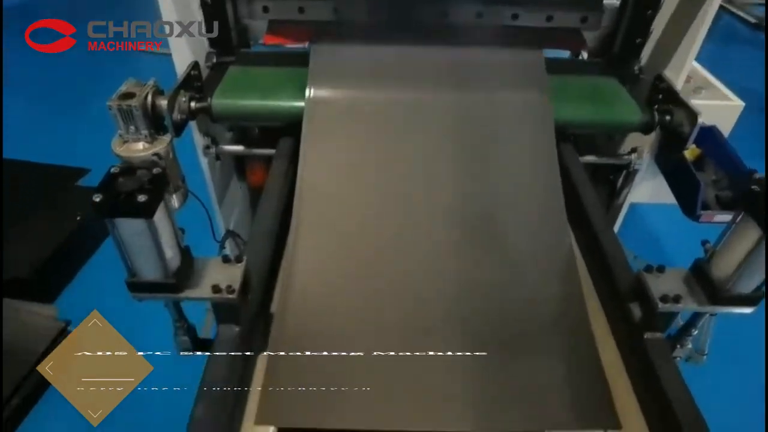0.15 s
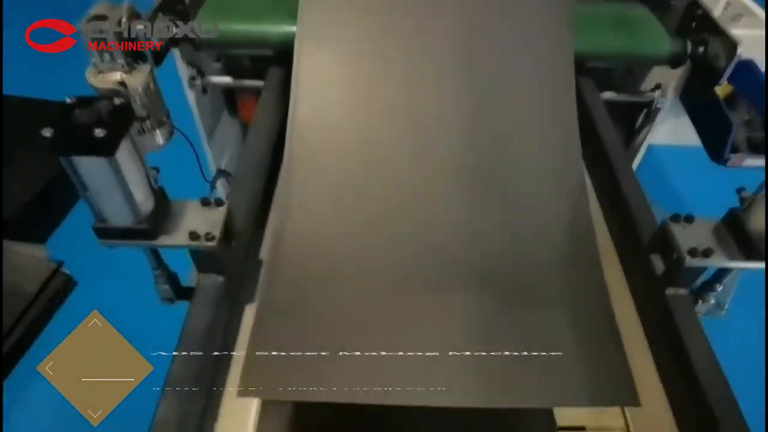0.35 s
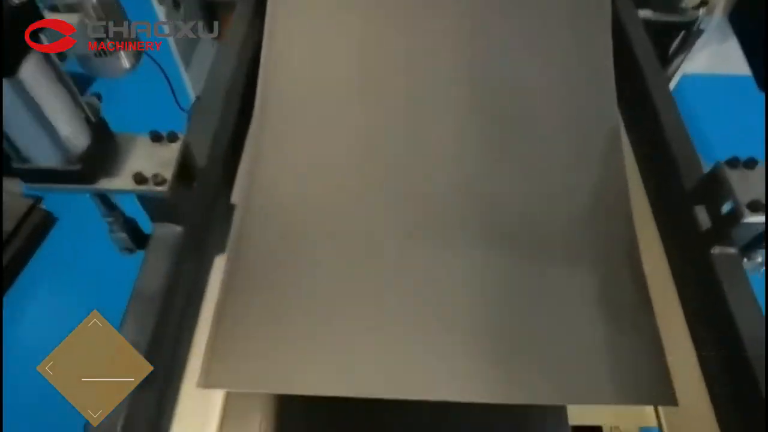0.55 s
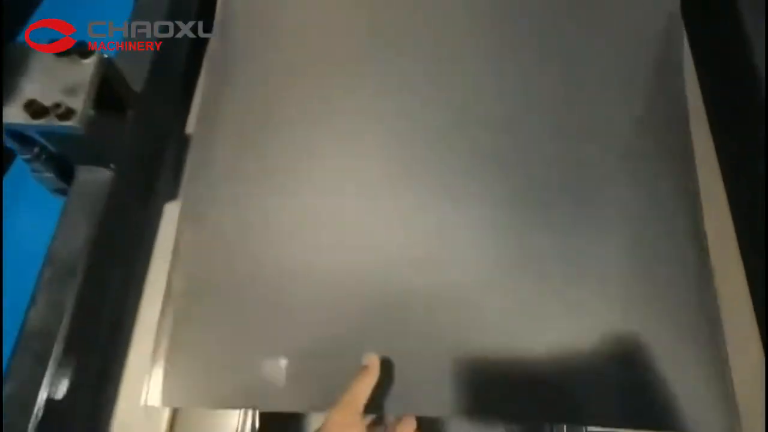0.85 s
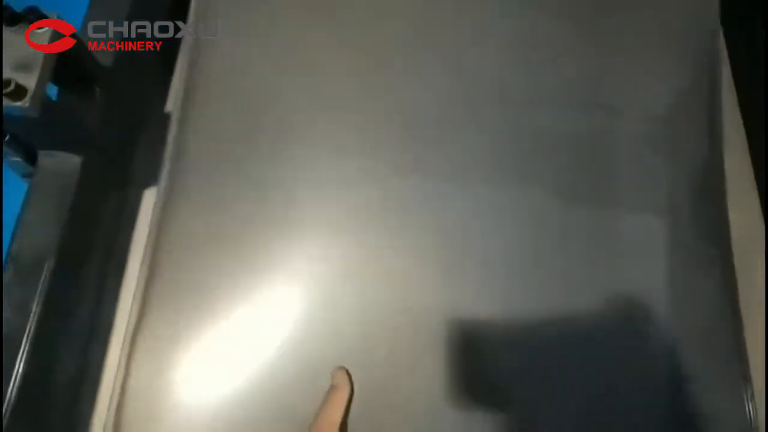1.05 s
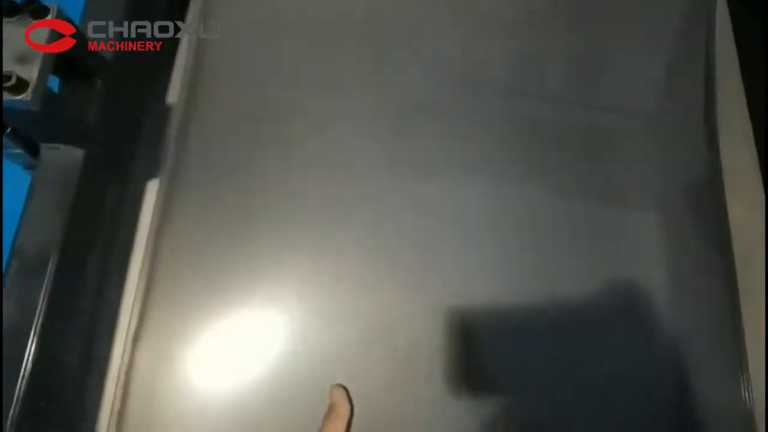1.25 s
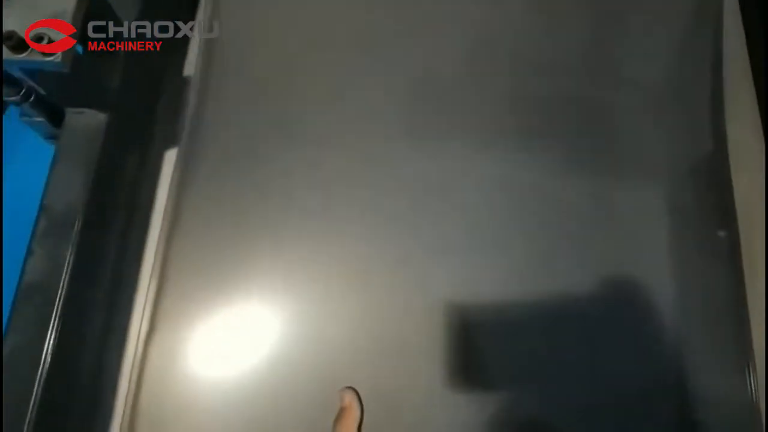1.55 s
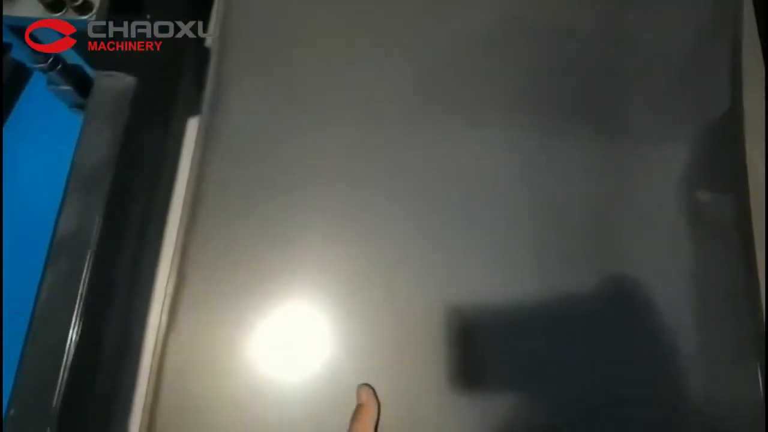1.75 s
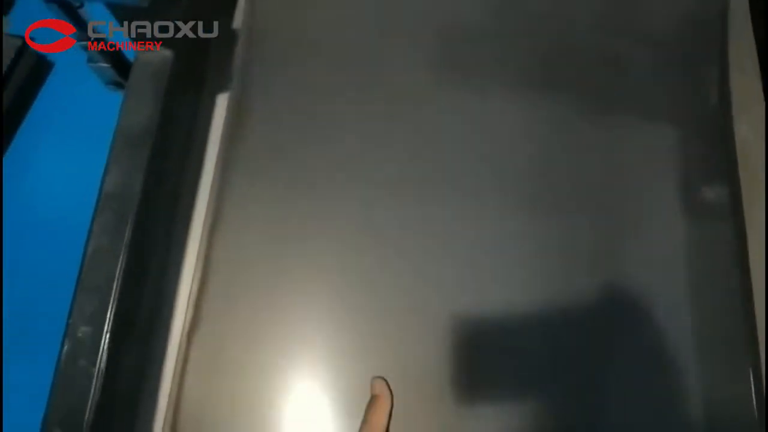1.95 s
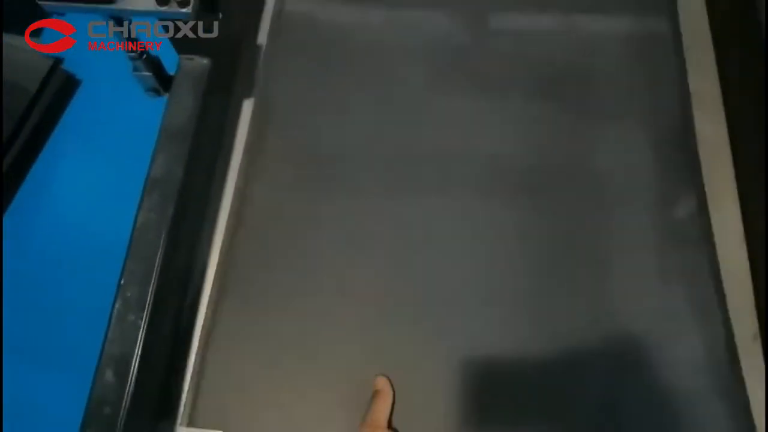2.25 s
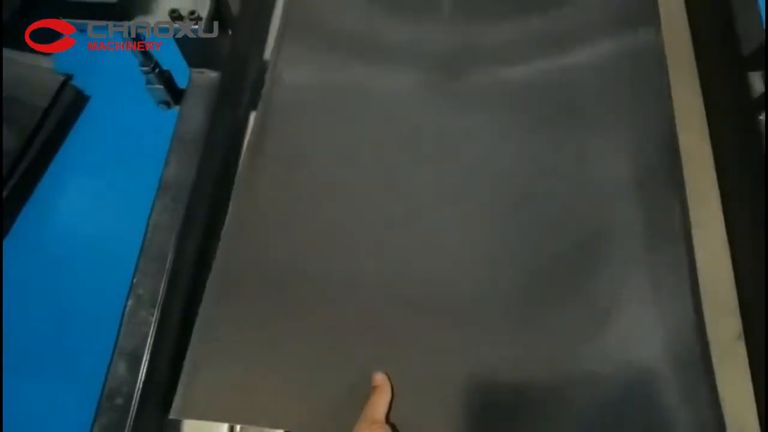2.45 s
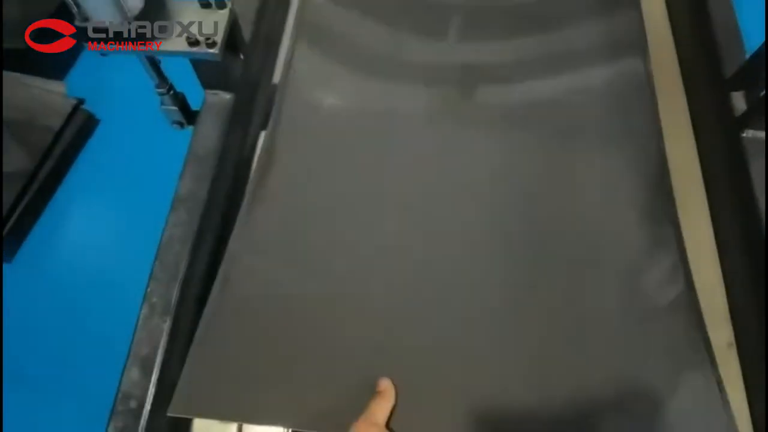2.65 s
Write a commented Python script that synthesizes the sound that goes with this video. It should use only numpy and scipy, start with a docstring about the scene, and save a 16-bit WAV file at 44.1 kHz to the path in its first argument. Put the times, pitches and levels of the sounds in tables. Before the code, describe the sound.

Plastic sheet production machine roars and hums in a factory hall, loud at first then falling; early heavy clunks ring out, and fingers tap and scuff the sheet close to a hand-held microphone.

```python
"""A plastic sheet line runs in a factory hall, heard from a hand-held microphone that turns away from it.
The roar, band-shaped noise, starts loud and falls; sine tones waver over it as motor hum and drive whine.
Heavy clunks, noise that rings out through the hall, come early, near 1.7 s and near 2 s; decaying modes
add a low thump to the first. From 0.36 s on a finger taps (the same modes) and scuffs (grainy noise)
the sheet close by. One strong hum swells near 0.9 s and again near 2.1 s."""
import sys
import numpy as np
from scipy import signal
from scipy.fft import rfft, irfft
from scipy.io import wavfile
from scipy.ndimage import uniform_filter1d

SR = 44100
rng = np.random.default_rng(int(sys.argv[2]) if len(sys.argv) > 2 else 0)


def generate_wav(signal):
    """Clip the signal to [-1, 1] and save it as 16-bit WAV at the path in sys.argv[1]."""
    frames = np.transpose(np.atleast_2d(signal))
    scaled = np.clip(frames, -1, 1) * 32767
    pcm = np.round(scaled).astype(np.int16)
    wavfile.write(sys.argv[1], SR, pcm)


N = 123480


def amp(db):
    """Amplitude gain of a level in dB."""
    return 10 ** (np.asarray(db) / 20)


def db_of(power):
    """Level in dB of a power ratio."""
    return 10 * np.log10(power)


def evened(x):
    """Scale to rms 1."""
    return x / np.sqrt(np.mean(x ** 2) + 1e-20)


def read(points, hz):
    """Interpolate a table over log frequency."""
    f, value = np.transpose(points)
    return np.interp(np.log(hz + 1), np.log(f + 1), value)


def over_time(points, t):
    """Interpolate a two-column table linearly over time."""
    return np.interp(t, *np.transpose(points))


def sides(lean_db):
    """Left and right gain for a left-over-right level difference."""
    return amp(np.array([lean_db / 2, -lean_db / 2]))


def drift(t, top_hz):
    """Slow random wander, rms 1: sines from 1 Hz to top_hz, weaker as they get faster."""
    rates_hz = np.geomspace(1, top_hz, num=16)
    return evened(sum(np.sin(2 * np.pi * (f * t + rng.random())) / np.sqrt(f) for f in rates_hz))


def struck(t, rise_s, t60_s):
    """Envelope of a blow: linear rise times exponential fall."""
    t = np.maximum(t, 0)
    return np.minimum(t / rise_s, 1) * amp(-60 * t / t60_s)


def hall_noise(colour, field_db):
    """Diffuse stereo noise, rms 1: partly alike channels, shaped over frequency and time."""
    # left-right correlation: (frequency [Hz], likeness [-1..1])
    likeness = [(60, .996), (130, .992), (200, .98), (290, 0.88), (450, 0.72), (640, 0.62), (950, 0.2),
                (1410, -0.1), (3100, -0.05), (6820, 0.05), (15000, 0)]
    # stereo balance: (frequency [Hz], left over right [dB])
    balance = [(500, 0), (800, 0), (1290, -1.5), (2380, -6), (4400, -7), (6000, 0), (8120, 8), (11000, -8),
               (15000, 4.5)]
    hop, window = 256, 1024  # samples
    frames, hz = N // hop + 5, np.fft.rfftfreq(window, 1 / SR)
    a, b, c, d = rng.standard_normal((frames, len(hz), 4)).T
    same = np.clip(read(likeness, hz), -1, 1)[:, None]
    left, other = a + 1j * b, c + 1j * d
    spectra = np.array([left, same * left + np.sqrt(1 - same ** 2) * other])
    frame_s = np.arange(frames) * hop / SR
    spectra *= amp(read(colour, hz)[:, None] + field_db(hz[:, None], frame_s))
    spectra *= sides(read(balance, hz))[:, :, None]
    return evened(signal.istft(spectra, nperseg=window, noverlap=window - hop)[1][:, :N])


def roar():
    """Broadband machine noise whose bass, treble and local patches drift in level."""
    # overall course: (time [s], roar level [dB], treble shelf [dB above roar])
    course = [(0, -34.5, 3), (.14, -35, 6), (.35, -32.5, -2.5), (.55, -36.5, -3), (.65, -38, -1),
              (.78, -35.5, -5), (.86, -39, -2), (1.0, -38.5, -3), (1.2, -38, -4), (1.5, -37.5, -5),
              (1.75, -39, -5), (1.85, -42, 1), (2.0, -39.5, -1), (2.2, -41.5, -4.5), (2.5, -43, -4.5),
              (2.8, -41.5, -3)]
    # density before the shelves: (frequency [Hz], relative level [dB per Hz])
    colour = [(30, 3.5), (60, -3), (120, -5), (230, -3.5), (400, -4), (520, -8.5), (800, -11), (1200, -14),
              (1600, -16), (2500, -16), (4200, -19.5), (4900, -22), (6500, -24), (7600, -25.5),
              (12000, -28), (16000, -43)]
    # bass shelf: (time [s], level [dB above roar])
    bass = [(0, 0.5), (.55, 2.5), (.9, 0), (1.5, 2.5), (1.8, -1), (2.8, 1.5)]
    bass_hz, treble_hz = 250, 7850  # shelf corners
    patch_rms_db, swell_rms_db = 1.4, 0.43
    s, level_db, treble_db = np.transpose(course)

    def field(hz, frame_s):
        patches = rng.standard_normal((len(frame_s), len(hz))).T
        patches = uniform_filter1d(patches, size=12, axis=0)  # over frequency
        patches = evened(uniform_filter1d(patches, size=14, axis=1))  # over time
        swell = drift(frame_s, 6.46)
        bass_shelf_db = over_time(bass, frame_s) / (1 + (hz / bass_hz) ** 4)
        treble_shelf_db = np.interp(frame_s, s, treble_db) / (1 + (treble_hz / (hz + 1)) ** 4)
        return patch_rms_db * patches + swell_rms_db * swell + bass_shelf_db + treble_shelf_db

    return amp(np.interp(np.arange(N) / SR, s, level_db)) * hall_noise(colour, field)


def tones():
    """Motor hum and drive whine: sines with wandering phase and level, some moving between the sides."""
    # (frequency [Hz], left over right at start [dB], same at end [dB], left phase lead [rad],
    #  waver rms [dB], then mean level [dB] at each of level_times_s)
    tone_table = [(265.5, 0, 0, 0, 2, -45, -47, -49, -54, -54, -52),
                  (300, 0, -7, -.6, 2.5, -44, -46, -43, -47, -51, -50),
                  (596, 0, 3, .3, 2.5, -62, -66, -59, -60, -61, -70),
                  (663.3, 0, 0, .35, .7, -66, -62, -59, -57, -53.5, -52.5),
                  (796.3, 0, 2, .5, 1.5, -62, -59, -56, -57, -64, -68),
                  (1128.5, -2, -2, 1, 2, -66, -64, -60, -61, -65, -68),
                  (1193.6, 0, -7, .5, 2, -64, -64, -61, -65, -59, -62),
                  (1261, -6, 2, 2, 2, -55, -58, -60, -59, -56, -57),
                  (3966, -10, -9, -2.7, 3, -66, -62, -63, -62, -62, -63),
                  (4000, -10, -9, -2.7, 3, -56, -58, -52, -55, -56, -62),
                  (4035, -10, -9, -2.7, 3, -58, -55, -55, -58, -61, -63)]
    # times of the tone levels: (time [s], ...)
    level_times_s = (.2, .7, 1.1, 1.5, 2.1, 2.7)
    wobble_rms_turns = .04
    t, out = np.arange(N) / SR, np.zeros((2, N))
    slow_t = t[::256]
    for hz, start_lean_db, end_lean_db, lead_rad, waver_db, *tone_db in tone_table:
        lead_turns = np.array([[lead_rad], [0]]) / (2 * np.pi)
        start_turns = rng.random()
        wobble = drift(slow_t, 5.02).repeat(256)[:N]
        turns = hz * t + start_turns + lead_turns + wobble_rms_turns * wobble
        waver = np.interp(t, slow_t, drift(slow_t, 9.5))
        level_db = np.interp(t, level_times_s, tone_db) + waver_db * waver
        lean_db = np.linspace(start_lean_db, end_lean_db, N)
        out += sides(lean_db) * amp(level_db) * np.sin(2 * np.pi * turns)
    return out


def swelling_hum():
    """Strongest hum: one steady-pitched sine that swells twice."""
    # (time [s], level [dB])
    hum_level = [(0, -49), (.3, -53), (.6, -51), (.75, -44), (.9, -38), (1.1, -40), (1.3, -48), (1.45, -55),
                 (1.78, -52), (1.95, -45), (2.12, -44), (2.25, -47), (2.4, -57), (2.8, -52)]
    hum_hz, lean_db = 424.8, -2  # left over right
    t = np.arange(N) / SR
    hum = amp(over_time(hum_level, t)) * np.sin(2 * np.pi * hum_hz * t)
    return sides(lean_db)[:, None] * hum


def machinery():
    """The running line: roar, wavering tones and the swelling hum, summed."""
    return roar() + tones() + swelling_hum()


def clunks():
    """Blows of the line's cylinders, mostly the hall ringing out: dull and bright noise halves."""
    # (time [s], level [dB], ring-out t60 [s], bright half up and dull half down by [dB])
    blows = [(0.148, -33.5, 1.6, 2.5), (0.362, -41, 0.39, 5), (.45, -36.5, 1.6, -1), (.76, -50, 0.13, -7),
             (1.711, -30, 0.14, -3), (1.981, -43, 0.55, -5.5)]
    # density: (frequency [Hz], relative level [dB per Hz])
    colour = [(40, -36), (130, -5), (270, -4), (550, -27), (780, -5.5), (1400, -11.5), (2500, -12.5),
              (4100, -13), (5200, -24.5), (7600, -30), (16000, -53)]
    rise_s, split_hz = 0.012, 600
    t, out = np.arange(N) / SR, 0
    for side in (-1, 1):  # dull, bright

        def half_db(hz, frame_s):
            return db_of(1 / (1 + ((hz + 1) / split_hz) ** (-4 * side))) + 0 * frame_s

        power = sum((amp(db + side * bright_db) * struck(t - s, rise_s, t60_s)) ** 2
                    for s, db, t60_s, bright_db in blows)
        out = out + np.sqrt(power / 2) * hall_noise(colour, half_db)
    return out


def scuffs():
    """Short grainy bursts of friction: a bright band, an airy top and a lower rasp."""
    # (time [s], middle level [dB], t60 [s], top over middle [dB], low over middle [dB],
    #  left over right [dB])
    bursts = [(.542, -39, 0.054, 1, -3, 6), (0.552, -54.5, 0.092, 9, -6, 2), (.567, -50, .06, 11, -1, 5),
              (0.575, -47, 0.062, 0, 12.5, 5), (0.589, -55, 0.057, 12, -2, 8), (.599, -57, .15, 5, -6, 6),
              (.659, -44, 0.041, -10, -8, 3), (1.709, -42, 0.14, 1, 1, -1), (1.715, -48, 0.11, -3, 1.5, 7),
              (1.725, -41, 0.079, -4, -3, 8), (1.7355, -25, 0.011, -18, -14, 11),
              (1.747, -37.5, .1, -15, -21, 7), (1.760, -43, .12, -22, -22, 17),
              (1.768, -43, 0.043, -14, -17, 4), (1.78, -38, 0.047, -8, -27, 3),
              (1.788, -38, 0.045, -15, -22, 8), (1.8, -41, 0.095, -18, -9, 4),
              (1.817, -47.5, 0.56, -18, -3, -2), (1.977, -49, .06, 1, -8, 7),
              (2.008, -38.5, 0.047, 0, -5, 1), (2.022, -49, 0.33, -6, -2, 4), (2.036, -60, 0.065, 4, -2, 0),
              (2.061, -46.5, .08, -14, -10, 9)]
    # bright middle band: (frequency [Hz], relative level [dB])
    middle_colour = [(4500, -35), (5600, 2), (7000, 14), (8200, 9.5), (9500, -1), (16000, 1.5)]
    # airy top: (frequency [Hz], relative level [dB])
    top_colour = [(6000, -29), (9000, 9.5), (11500, 6.5), (14000, 16), (15700, 2.5)]
    # lower rasp: (frequency [Hz], relative level [dB])
    low_colour = [(1200, -8), (2800, -14), (4200, 7), (5200, -4.5), (7000, -4), (16000, -37)]
    rise_s, grain_db, grain_s, grain_cap = .0012, 3.5, .0012, 1.5  # cap in grain rms
    t, hz = np.arange(N) / SR, np.fft.rfftfreq(N, 1 / SR)
    noise = rfft(rng.standard_normal((3, 2, N)))
    colours = (middle_colour, top_colour, low_colour)
    middle, top, low = (evened(irfft(z * amp(read(c, hz)), N)) for z, c in zip(noise, colours))
    grain = evened(uniform_filter1d(rng.standard_normal(N), round(grain_s * SR)))
    grain = evened(amp(grain_db * np.minimum(grain, grain_cap)))
    out = np.zeros((2, N))
    for s, db, t60_s, top_db, low_db, lean_db in bursts:
        a = slice(round(s * SR), round((s + .3) * SR))
        shape = amp(db) * struck(t[a] - s, rise_s, t60_s) * sides(lean_db)[:, None]
        rub = middle[:, a] + amp(top_db) * top[:, a] + amp(low_db) * low[:, a]
        out[:, a] += shape * grain[a] * rub
    return out


def thump_and_taps():
    """The low thump of the first clunk, then finger taps, ring decaying modes, varied each time."""
    # thump first, then taps: (time [s], relative level [dB], brightness [dB per octave about 500 Hz])
    hits = [(.15, -41, -8), (0.36, -27, -2), (0.558, -29, -5), (1.712, -29, 2), (1.724, -30, 4),
            (1.762, -27, -3), (1.981, -34, 1), (1.995, -35, 0), (2.009, -33, 3)]
    # decaying modes: (nominal frequency [Hz], relative level [dB], t60 [s])
    modes = [(130, -11, 0.08), (215, -4, 0.1), (327, 0, 0.04), (502, 0, 0.034), (713, -6, 0.04),
             (895, -5, .04), (1150, -7, 0.06), (1733, -10.5, 0.03), (4050, -14, 0.06)]
    rise_s, spread_rms_db, detune_rms = 0.0017, 2, .02  # detune as a fraction of frequency
    out, t = np.zeros(N), np.arange(5000) / SR
    hz, db, t60_s = np.transpose(modes)[:, :, None]
    chances = rng.standard_normal((len(hits), 2, len(modes), 1))
    for (s, level_db, bright_db), (spread, detune) in zip(hits, chances):
        mode_db = level_db + db + bright_db * np.log2(hz / 500) + spread_rms_db * spread
        mode_hz = hz * (1 + detune_rms * detune)
        ring = amp(mode_db - 60 * t / t60_s) * np.sin(2 * np.pi * mode_hz * t)
        out[round(s * SR):][:len(t)] += np.minimum(t / rise_s, 1) * ring.sum(0) / 2
    return out


def scene():
    """Sum of all layers; thump and taps are equal in both channels."""
    return machinery() + clunks() + scuffs() + thump_and_taps()


def record(dry):
    """Microphone colour, then a linear-phase low-pass."""
    # thin bass, a step down above the port resonance: (frequency [Hz], gain [dB])
    mic = [(20, -19), (45, -12), (70, -1.5), (7900, 2.5), (8500, -11), (9000, -7), (9600, -3), (16000, -3)]
    edge_hz = 15900
    heard = irfft(rfft(dry) * amp(read(mic, np.fft.rfftfreq(N, 1 / SR))), N)
    low_pass = signal.firwin(511, edge_hz, window=("kaiser", 9), fs=SR)
    return signal.oaconvolve(heard, low_pass[None], "same")


dry = scene()
out = record(dry)
generate_wav(out)
```